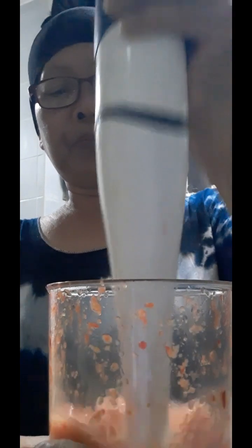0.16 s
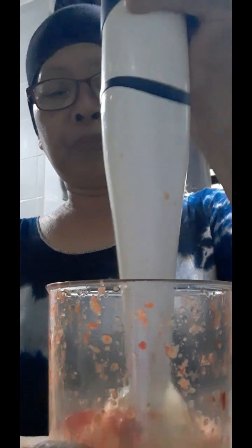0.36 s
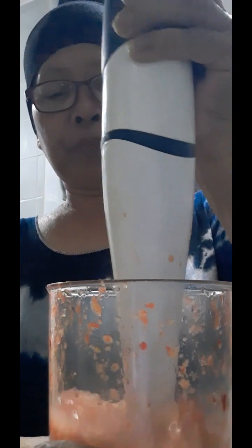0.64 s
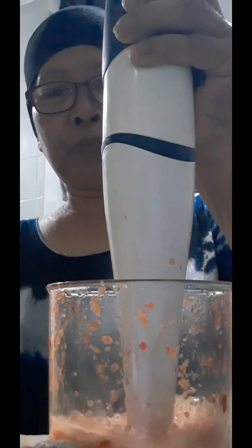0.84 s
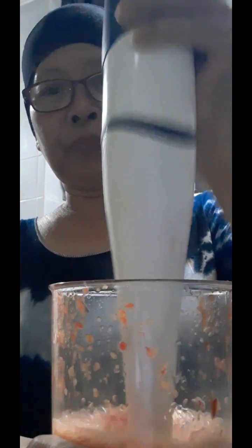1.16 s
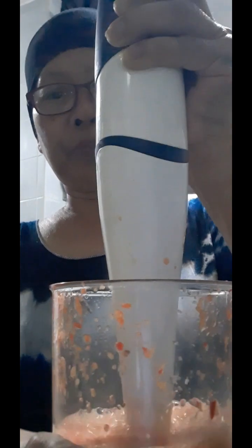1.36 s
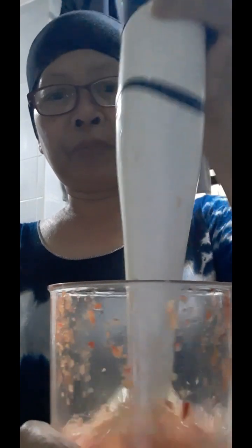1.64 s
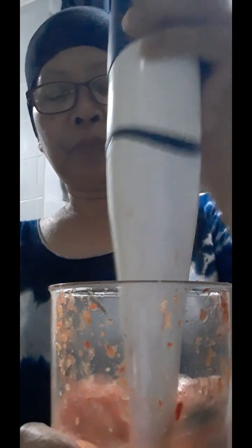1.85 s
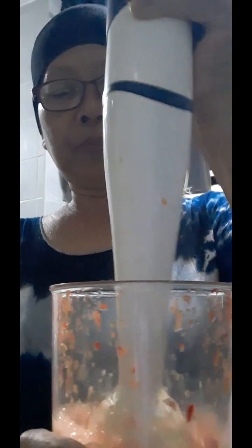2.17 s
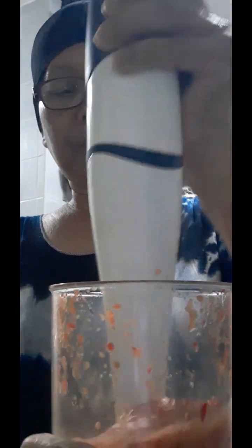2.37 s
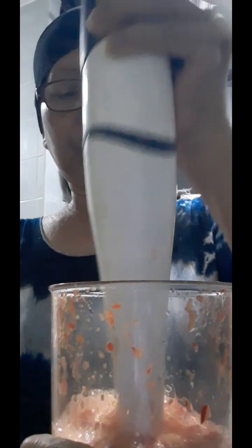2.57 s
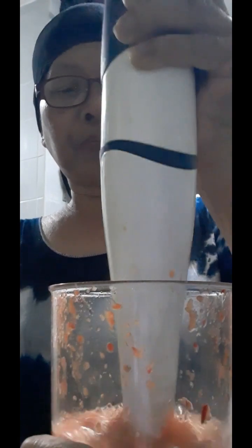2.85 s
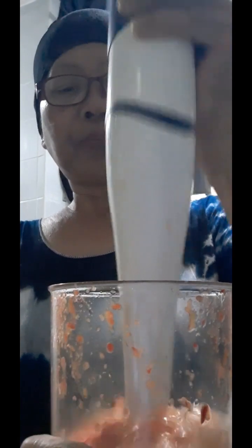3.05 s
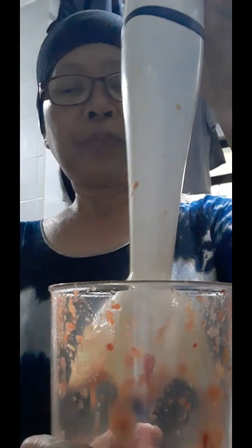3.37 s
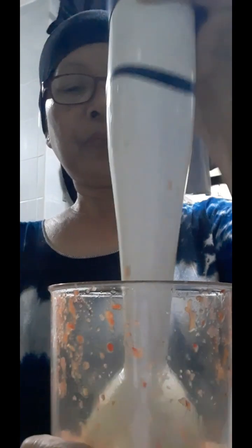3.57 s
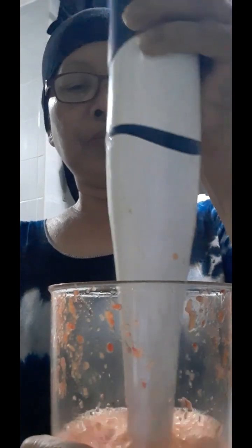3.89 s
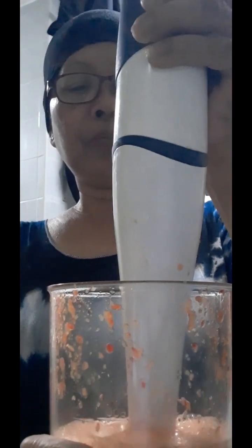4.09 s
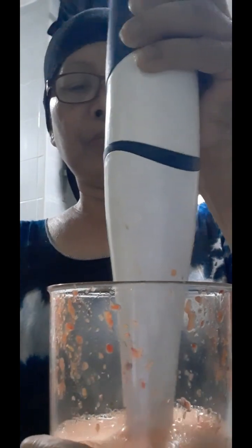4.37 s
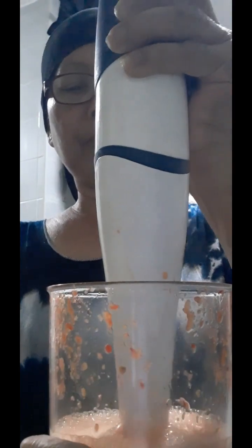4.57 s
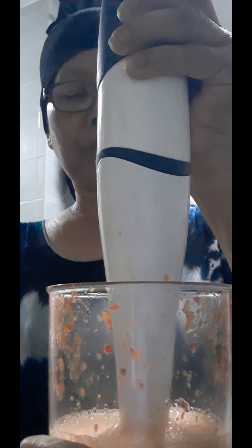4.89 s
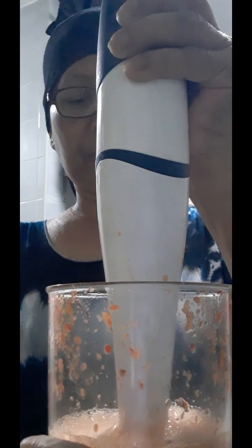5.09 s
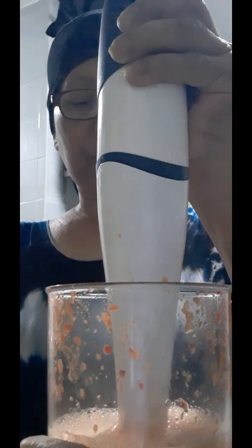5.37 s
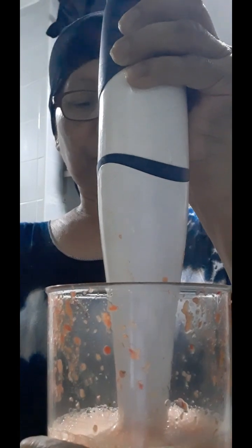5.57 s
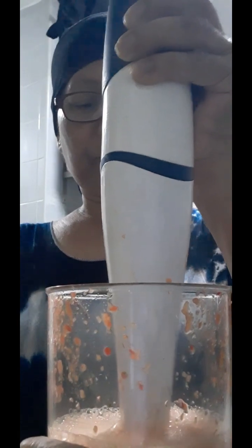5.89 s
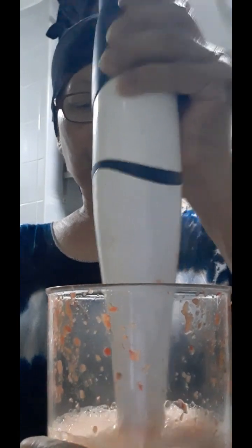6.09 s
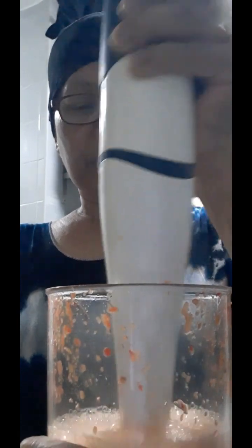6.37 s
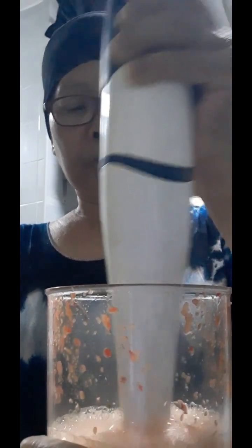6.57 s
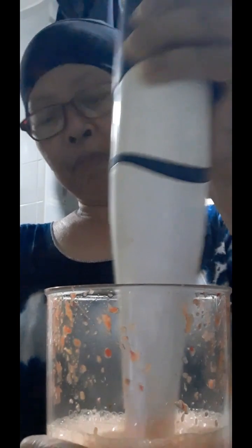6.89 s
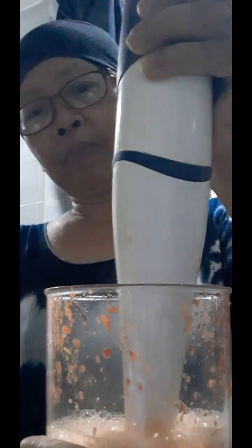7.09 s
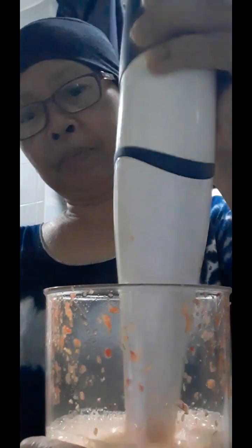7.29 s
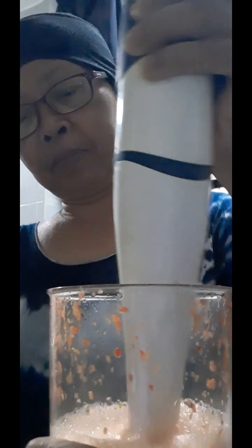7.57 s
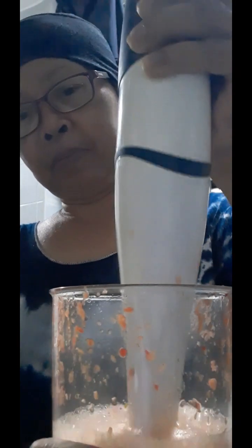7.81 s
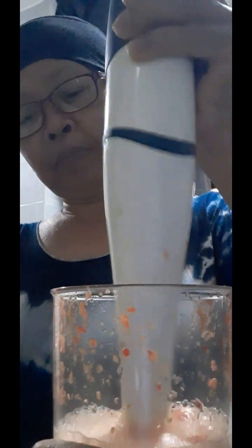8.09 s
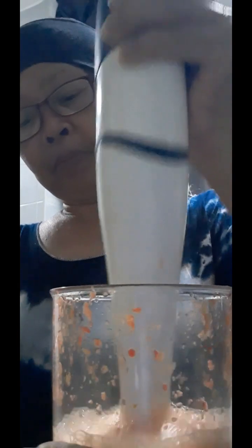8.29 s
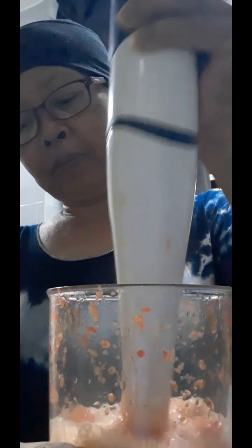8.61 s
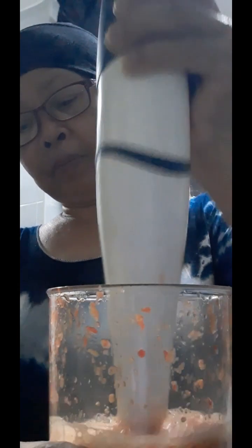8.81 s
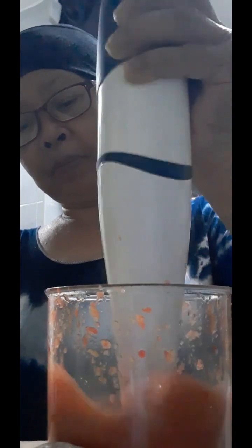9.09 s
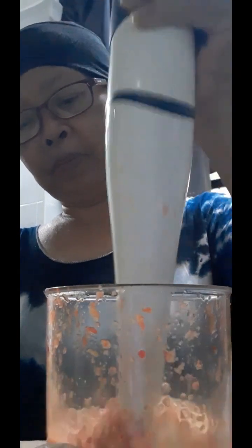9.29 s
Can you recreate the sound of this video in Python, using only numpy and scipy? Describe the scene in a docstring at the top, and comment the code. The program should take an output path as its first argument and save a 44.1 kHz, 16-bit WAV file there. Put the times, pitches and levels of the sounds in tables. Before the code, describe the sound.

Very close in a small tiled kitchen, a hand blender chops wet vegetables in a plastic beaker. Four rough bursts, crunching and slapping, each coast down in a falling whine. In a pause the foot knocks and plops free. Then a three-second run smooths into a gurgling hum and whine, followed by a brief burst and two more choppy ones. The stereo is uneven, stronger on the right.

```python
"""A stick blender chops vegetables in a plastic beaker, in short bursts and one long run, close by.
The blade's random blows become filtered noise: pulp slaps the beaker and chunks crack.
The motor's turning drives a hum, a stack of whines and a brush hiss, which coast down after each burst.
In the pauses the foot is lifted, knocks on the beaker and comes loose with a plop, a short rising tone.
Bubbles, gurgles, booms and handling rumble join in, and a small tiled kitchen answers."""
import sys
import numpy as np
from scipy import signal
from scipy.fft import rfft, irfft
from scipy.io import wavfile
from scipy.ndimage import uniform_filter1d

SR = 44100
rng = np.random.default_rng(int(sys.argv[2]) if len(sys.argv) > 2 else 0)


def dump_mix(stems):
    """Bounce the given channels to the path in sys.argv[1] as a 16-bit WAV at rate SR."""
    frames = np.atleast_2d(stems).T  # one column per channel
    limited = np.clip(frames, -1, 1)  # hard clip at full scale
    pcm = np.round(limited * 32767).astype(np.int16)
    wavfile.write(sys.argv[1], SR, pcm)


N = 416744  # length in samples
MAINS_HZ = 50
EDGE_HZ = 15600  # upper limit of the sound
USUAL_PACE = 130  # turns per second at which the levels that follow the pace are set


# Tone colours of churning pulp, of splashing and of cutting, as shapes without an overall level.
# Each row: frequency in Hz, strength in dB per Hz.
CHURN_COLOUR = [(25, -51), (45, -42), (70, -19.5), (105, -16), (160, -1.5), (230, -1.5), (300, -1),
                (400, 0), (500, -2.5), (570, -15), (800, -16), (1500, -40.5), (4000, -89.5)]
SPLASH_COLOUR = [(250, -39.5), (500, -5), (640, -1), (1000, -0.5), (1300, -6.5), (1900, -11), (2500, -17.5),
                 (3500, -21), (8000, -65)]
CUT_COLOUR = [(1000, -30), (2000, -0.5), (2700, 0), (4000, -2.5), (5500, 2), (7000, -3.5), (8400, -1),
              (9500, -9.5), (10700, -15), (12300, -8.5), (15000, -13.5), (16000, -40)]
LUMP_RING_DB = 4  # a heavy lump drives the lowest resonance harder
SLOSH_S = .0006  # typical sway of the sound's path through the rocking pulp


def blade(turns, push, chunky, churning, thumping, splashing, cutting):
    """Each blow of the blade churns, splashes and cracks at once, over a wash of swirling liquid."""
    sweep = 1 + .6 * np.cos(4 * np.pi * turns)  # two wings a turn
    clumps = amp(0.99 * wander(hz=52.4))
    throb = 1 + .075 * push  # sharper on each power stroke
    all_blows = impacts(per_s=900, spread_db=2.5, chance=sweep) * clumps
    all_snaps = impacts(per_s=320, spread_db=4.0, chance=sweep) * clumps * chunky
    slosh_hz, slosh_width, _ = BEAKER_MODES[0]
    sway_s = SLOSH_S * wander(hz=7)
    paths = []
    for blows, snaps in zip(all_blows, all_snaps):
        swirl, wash, fizz = rng.standard_normal((3, N))
        churn = sloshed(beaker(colour(blows + 0.67 * swirl, CHURN_COLOUR)), sway_s)

        lumps = colour(impacts(per_s=500, spread_db=2.0, chance=sweep)[0], CHURN_COLOUR)
        thump = beaker(lumps) + amp(LUMP_RING_DB) * resonance(lumps, slosh_hz, slosh_width)
        thump = sloshed(thump, sway_s)

        wet = blows + 0.31 * snaps + 0.89 * clumps * wash
        splash = beaker(vortex(colour(throb * wet, SPLASH_COLOUR)))

        # fibres tear briefly after each blow
        tearing = signal.lfilter([1], [1, -np.exp(-1 / (0.0011 * SR))], (blows + 1.3 * snaps) ** 2)
        torn = evened(np.sqrt(tearing) * rng.standard_normal(N))
        crackle = torn + 0.92 * np.sqrt(abs(sweep)) * fizz
        cut = vortex(colour(throb * crackle, CUT_COLOUR))

        path = churning * steadied(churn) + thumping * steadied(thump, size=2501)
        path += splashing * (steadied(splash) + bubbles())
        path += cutting * steadied(cut, size=6001)
        paths.append(path)
    return np.array(paths)


def impacts(per_s, spread_db, chance):
    """Random blows, many small and a few large, each push taking two paths with unrelated signs."""
    size = amp(spread_db * np.minimum(rng.exponential(1, N), 4.5))
    struck = rng.random(N) < per_s * chance / SR
    return evened(size * rng.choice([-1., 1.], (2, N)) * struck)


# The ways in which the filled beaker rings.
# Each row: frequency in Hz, width in Hz, strength in dB against the plain path (a knock uses it as a balance).
BEAKER_MODES = [(232.7, 39, -8), (301.2, 19.3, 11.5), (367.6, 29, 0.5), (484, 33, 3.5), (611, 33, -3),
                (1490, 92, 0), (2039, 113, 1.5)]


def beaker(x, ring_db=0):
    """The beaker adds its ringing modes to whatever stirs it."""
    return x + sum(amp(db + ring_db) * resonance(x, hz, width) for hz, width, db in BEAKER_MODES)


def sloshed(x, sway_s):
    """The pulp rocks in the beaker, so its resonances drift up and down by a few percent."""
    return np.interp(np.arange(N) - sway_s * SR, np.arange(N), x)


def vortex(x):
    """The funnel in the pulp changes depth, so its echo sweeps gurgling resonances through the sound."""
    delay_s = .0016 * np.exp(0.2975 * wander(hz=3.94))
    late = np.interp(np.arange(N) - delay_s * SR, np.arange(N), x)
    return x + .42 * late


# Lumps of pulp slump onto the blade or off the foot.
# Each row: middle of the swell in seconds, half-length in seconds, thump in dB, splash in dB.
LUMP_SURGES = [(0.058, 0.059, -14, -26), (0.368, 0.087, -14.5, -28), (.65, 0.084, -15.5, -45.5),
               (1.123, 0.076, -12.5, -42), (1.64, 0.045, -14.5, -29), (1.737, 0.05, -13.5, -23),
               (2.256, 0.098, -12.5, -27), (2.48, 0.016, -23, -49), (2.541, 0.023, -28, -50),
               (2.696, .025, -14.5, -34), (2.797, 0.089, -16, -35), (3.021, 0.029, -32, -38.5),
               (3.362, 0.0095, -32, -43), (3.463, 0.06, -32.5, -49.5), (3.582, 0.046, -40.5, -56),
               (3.685, 0.022, -16, -35), (3.825, 0.023, -18, -42), (4.4, 0.054, -16, -24.5),
               (4.51, 0.019, -15.5, -24.5), (4.733, 0.028, -16, -30), (6.811, 0.021, -40, -50),
               (7.008, 0.026, -18.5, -28), (7.348, 0.027, -19, -31), (7.615, 0.052, -22.5, -34.5),
               (8.07, .04, -12, -37), (8.325, .045, -13, -30), (8.514, .05, -30.5, -43),
               (8.66, .04, -21, -45), (8.852, 0.035, -12, -35), (8.98, .04, -16, -42),
               (9.281, 0.09, -14.5, -29.5)]
# The blade spins in a pocket of air and grips less pulp.
# Each row: middle in seconds, half-length in seconds, change of churning, splashing and cutting in dB.
AIR_POCKETS = [(.235, 0.047, -1.5), (0.576, 0.013, -0.5), (1.435, 0.08, -3), (5.45, 0.56, -1),
               (7.48, .04, -2.5), (8.186, 0.047, -4.5), (8.6, 0.079, -2), (9.11, 0.036, -4.5)]
# How sounds follow the motor: dB gained per extra turn per second of pace, power of the spin-up share.
CHURN_LAW, SPLASH_LAW, CUT_LAW = (-0.063, 1.7), (-0.021, 1.76), (0.012, 1.75)
SURGE_CUT_DB = -4.5  # a lump's crackle against its splash
DRIP_DB, DRIP_FIZZ_DB = -61.5, -67  # pulp keeps trickling down the wall and its froth fizzes


def pulp(pace, spin):
    """Gains of churning, thumping, splashing and cutting: motor speed, air pockets and lumps set them."""
    *_, churn_db, splash_db, cut_db, _, _ = latest_press()
    dip_db = sum(db * bell(s, half_s) for s, half_s, db in AIR_POCKETS)
    thumps, splashes = sum(amp(levels)[:, None] * bell(s, half_s) for s, half_s, *levels in LUMP_SURGES)
    churning = driven(churn_db + dip_db, CHURN_LAW, pace, spin)
    splashing = np.hypot(driven(splash_db + dip_db, SPLASH_LAW, pace, spin), splashes)
    cutting = np.hypot(driven(cut_db + dip_db, CUT_LAW, pace, spin), amp(SURGE_CUT_DB) * splashes)
    return churning, thumps, splashing + amp(DRIP_DB), cutting + amp(DRIP_FIZZ_DB)


BUBBLE_HZ, BUBBLES_PER_S = (620, 2400), 110  # lowest and highest starting pitch; bursts per second
BUBBLE_SPREAD_DB, BUBBLE_DB = 3.5, -7  # spread of size; level against the splash
BUBBLE_CYCLES, BUBBLE_RISE = 4, .035  # cycles until a blip fades to about a third; rise in pitch


def bubbles(count=24):
    """Air whipped into the pulp bursts in short rising blips, the small high ones more quietly."""
    out, t = np.zeros(N), np.arange(2000) / SR
    for hz in np.geomspace(*BUBBLE_HZ, count):
        age = t * hz / BUBBLE_CYCLES
        tone = np.sin(2 * np.pi * hz * t * (1 + BUBBLE_RISE * age))
        blip = np.exp(-age) * tone / np.sqrt(hz)
        for when, chance in rng.random((round(BUBBLES_PER_S * N / SR / count), 2)):
            size_db = BUBBLE_SPREAD_DB * min(-np.log(1 - chance), 4)
            add(out, when * N / SR, amp(size_db) * blip)
    return amp(BUBBLE_DB) * evened(out)


# Presses of the switch.
# Each row: on in seconds, off in seconds, spin-up time in seconds, coasting time in seconds,
# then base levels in dB of churning, splashing and cutting, the whine's offset in dB,
# and its further offset while coasting in dB.
PRESSES = [(-.1, .81, .03, .17, -19, -27.5, -31, -3, -3), (1.005, 1.898, .036, 0.11, -18, -26, -31, -2, -1),
           (2.11, 2.42, .039, 0.15, -20.5, -27, -32, 2, -3),
           (2.645, 2.879, 0.023, .13, -22, -27, -33.5, 0, -5),
           (3.643, 6.625, .04, .202, -16.5, -25, -30.2, 0, 4),
           (6.945, 6.957, .03, .25, -14, -21, -26, 10, 3), (7.0, 7.425, .03, .24, -19, -25, -29, .5, 4),
           (7.795, 8.384, .04, .1, -17.5, -24.5, -30, 1, -2),
           (8.515, 9.37, .13, 0.1, -17, -25, -30.5, 0, 3)]
# Speed the motor reaches under power, low in thick pulp and high when a funnel opens round the blade.
# Each row: time in seconds, pace in turns per second.
MOTOR_PACE = [(.08, 113), (.23, 138), (.34, 114), (1.2, 114), (1.5, 167), (1.68, 122), (2.2, 104),
              (4.0, 107), (4.9, 131), (5.3, 142), (5.7, 151), (5.88, 160), (6.02, 157), (6.15, 161),
              (6.4, 156.5), (7.42, 158.5), (7.9, 119), (8.07, 115), (8.2, 153), (8.33, 128), (8.95, 121),
              (9.1, 157), (9.22, 115)]


def motor():
    """Spins up towards its pace at each press and coasts down; gives pace, share of it, power on or off."""
    t = np.arange(N) / SR
    pace, = curves(MOTOR_PACE)
    held_pace, spin, powered = pace.copy(), np.zeros(N), np.zeros(N)
    for on, off, rise_s, coast_s, *_ in PRESSES:
        start = max(round(on * SR), 0)
        since = t[start:]
        until_off = np.minimum(since, off)
        spun_up = 1 - (1 - spin[start]) * np.exp((on - until_off) / rise_s)
        spin[start:] = spun_up * np.exp((until_off - since) / coast_s)
        held_pace[start:] = np.interp(until_off, t, pace)
        powered[start:] = since < off
    return held_pace, np.maximum(spin, 0), uniform_filter1d(powered, size=600)


def latest_press():
    """The columns of the most recent press, sample by sample."""
    rows = np.array(PRESSES)
    return rows[np.maximum(np.searchsorted(rows[:, 0], np.arange(N) / SR) - 1, 0)].T


def driven(level_db, law, pace, spin):
    """Gain of a sound that swells as the motor spins up and shifts as the blade runs freer."""
    db_per_turn, power = law
    return amp(level_db + db_per_turn * (pace - USUAL_PACE)) * spin ** power


# Level of the shaft's hum at full spin before the beaker rings, strongest in thin pulp.
# Each row: time in seconds, level in dB.
HUM_LEVEL = [(.9, -38), (1.3, -32.5), (1.5, -34), (1.7, -37), (4.4, -36.5), (4.9, -32.5), (5.4, -32),
             (5.9, -23.5), (6.3, -23), (6.6, -26.5), (7.3, -30.5), (8.0, -32.5)]
HUM_SPIN_POWER = 6.8  # the hum needs full speed


def shaft_hum(turns, spin):
    """The unbalanced shaft hums at its turning rate and multiples, which swell at beaker resonances."""
    phase = 2 * np.pi * turns + .08 * wander(hz=10)
    hum = np.zeros(N)
    for k, db in enumerate([0, -10, -24, -22, -28, -27], 1):
        hum += amp(db) * (1 + .14 * wander(hz=9)) * np.sin(k * phase)
    return amp(curves(HUM_LEVEL)[0]) * spin ** HUM_SPIN_POWER * beaker(np.sqrt(2) * hum)


# The housing that the whine passes through.
# Each row: frequency in Hz, gain in dB.
HOUSING_GAIN = [(500, -8), (1500, 5), (2000, -4), (2700, -1), (3400, -11), (4200, 1), (4900, 2.5),
                (5600, -4), (6100, -2), (6800, -11), (7500, -5), (8300, 5), (9000, -10), (10500, -20),
                (11800, -12), (13500, -15), (15500, -12)]
# Strength of the whine's multiples, from the first up, each a single value in dB.
WHINE_STACK_DB = [1, 3, -5, -1, -1, -1, -2, -4, -6, -8]


def commutator(speed, turns, push, powered, count=24):
    """Brushes tick over the segments: a stack of whines, rough under power, smoother while coasting."""
    whine = np.zeros(N)
    for k, stack_db in enumerate(WHINE_STACK_DB, 1):
        hz = k * count * speed
        sparks = (.3 + (.35 + .17 * k) * powered) * wander(hz=260)
        drowned = amp(-8 * powered * (hz < 6500))  # fast swirling pulp damps the lower whines
        level = amp(read(HOUSING_GAIN, hz) + stack_db) * drowned * (hz < EDGE_HZ)
        tone = np.sin(2 * np.pi * k * count * turns + sparks)
        whine += level * tone * amp(3.3 * wander(hz=25))
    return whine * (1 + .5 * push)


WHINE_DB, WHINE_LAW = -44.1, (.11, 1.6)  # base level; law in the same form as the pulp's
WHINE_GROWTH_DB_PER_S, BUILD_UP_S = 2.2, 2.3  # it builds up after the switch is pressed, for this long


def whine_gain(pace, spin, powered):
    """The whine grows after each press, follows the motor, and shifts in level while coasting."""
    on, *_, whine_db, coast_db = latest_press()
    held_s = np.minimum(np.arange(N) / SR - on, BUILD_UP_S)
    level_db = WHINE_DB + whine_db + coast_db * (1 - powered) + WHINE_GROWTH_DB_PER_S * held_s
    return driven(level_db, WHINE_LAW, pace, spin)


HISS_HZ, HISS_WIDTH_HZ = 8340, 610  # average centre; width
HISS_DB, HISS_LAW = -49, (-0.1, 1.1)  # level before its slow sway; law in the same form as the pulp's


def brush_hiss():
    """The rubbing brushes excite one narrow, wandering resonance of the housing."""
    ringing = narrow_noise(N, HISS_WIDTH_HZ)
    hz = HISS_HZ * (1 + .018 * wander(hz=4))
    shifted = (ringing * np.exp(2j * np.pi * np.cumsum(hz) / SR)).real
    return evened(shifted) * amp(4.4 * wander(hz=3.0))


# Chunks and the foot strike the beaker, and the switch clicks; the levels are relative within each column. Each
# row: time in seconds, crack in dB, thud in dB, slap in dB, ring in dB.
KNOCKS = [(0.1364, -26, -27, -21, -43), (0.177, -22.5, -33, -29, -45), (.301, -21, -32, -16, -45),
          (0.3606, -34, -21, -18, -31), (0.4672, -26, -14, -23, -26), (0.593, -28, -25, -20, -25),
          (0.7549, -29, -23, -17, -28), (0.955, -32, -25, -27, -36), (1.309, -31, -31, -18, -38),
          (1.3694, -23, -22, -16, -38), (1.42, -32, -35, -23, -40), (1.584, -20, -32, -18, -29),
          (1.727, -24, -36, -25, -40), (1.807, -24, -20, -22, -32), (1.8989, -24, -32, -24, -40),
          (2.0958, -42.5, -31, -24.5, -52), (2.169, -34, -16, -17, -26), (2.607, -36.5, -26, -30, -39),
          (2.6568, -23, -18, -20, -24.5), (3.0153, -48, -26, -27, -40), (3.1025, -38, -44, -33, -62),
          (3.143, -48, -40, -43, -45), (3.2316, -54, -44, -56, -51), (3.3155, -54, -53, -41, -60),
          (3.347, -24.5, -22, -20.5, -30.5), (3.5196, -41.5, -40, -49, -48), (3.554, -50, -40, -34, -44),
          (4.178, -23, -16, -25, -32), (4.839, -24, -31, -17, -39), (4.97, -25, -13, -17, -32),
          (5.873, -27, -33, -29, -38), (6.035, -21, -30, -28, -40), (6.82, -48, -24.5, -41, -37),
          (7.2417, -23.5, -33, -27, -42), (7.551, -28, -34, -25, -42), (7.8038, -48, -27, -30, -33),
          (7.9142, -33, -34, -17, -42), (8.4044, -24.5, -17, -15.5, -40), (8.5354, -47, -26, -26, -37),
          (8.6086, -26.5, -27, -29, -26), (8.7217, -25, -35, -17, -45), (8.979, -33, -18, -16, -32),
          (9.031, -24.5, -19, -18, -32), (9.1717, -26, -21, -29, -28), (9.264, -30, -24, -20, -23),
          (9.3739, -36, -28, -27, -36)]
RING_DULL_HZ = 1400  # a knock rings the modes above this only weakly


def knocks():
    """Hard contacts: a dry crack, a wet slap, a dull thud and the beaker's hollow ring."""
    cracks, thuds, slaps, rings = np.zeros((4, N))
    t = np.arange(6000) / SR
    ring = np.zeros(len(t))
    for hz, width, db in BEAKER_MODES:
        strength = amp(db) / (1 + (hz / RING_DULL_HZ) ** 2)
        ring += strength * np.exp(-np.pi * width * t) * np.sin(2 * np.pi * hz * t)
    # the small beaker radiates no deep bass
    ring = signal.lfilter(*signal.butter(2, 90, "high", fs=SR), ring)
    for s, crack_db, thud_db, slap_db, ring_db in KNOCKS:
        crunch = rng.standard_normal(len(t))
        add(cracks, s, amp(crack_db + 2.0) * crunch * np.exp(-t / 0.0049))
        add(slaps, s, amp(slap_db + 1.0) * crunch * np.exp(-t / 0.0044))
        add(thuds, s, amp(thud_db + 8.0) * np.exp(-t / .00008))
        add(rings, s, amp(ring_db) * ring)
    wet = beaker(colour(slaps, SPLASH_COLOUR))
    dull = beaker(colour(thuds, CHURN_COLOUR), ring_db=1.5)
    return colour(cracks, CUT_COLOUR) + wet + dull + rings


# Air is sucked in under the foot.
# Each row: start in seconds, starting pitch in Hz, level in dB before the soft onset, seconds to fade by 60 dB.
PLOPS = [(3.554, 738, -13, .028), (3.555, 911, -24, .025), (3.556, 1230, -27, .045),
         (7.716, 847, -19, 0.024)]


def plop():
    """An air pocket rings and rises in pitch as it opens."""
    out, t = np.zeros(N), np.arange(6000) / SR
    for s, hz, db, t60 in PLOPS:
        swell = amp(db - 60 * t / t60) * (1 - np.exp(-t / 0.00096))
        add(out, s, swell * np.sin(2 * np.pi * hz * t * (1 + 1.7 * t)))
    return out


# Spatter rings the hollow round the foot.
# Each row: start in seconds, length in seconds, first pitch in Hz, last guiding pitch in Hz,
# width in Hz, level in dB before it swells and fades.
GURGLES = [(0, 0.1, 897, 598, 150, -28), (.18, .14, 662, 984, 140, -27), (.23, .2, 2146, 2360, 300, -35),
           (.8, 0.22, 900, 468, 136, -31), (1.41, .07, 636, 523, 120, -27), (3.02, .13, 849, 566, 136, -48),
           (3.41, .12, 945, 764, 136, -43.5), (3.559, 0.075, 780, 890, 136, -49),
           (4.05, 1.1, 468.5, 495, 65, -22), (4.8, 1.91, 930, 1031, 280, -29.5),
           (8.26, 0.084, 1003, 880, 220.8, -24), (8.88, 0.16, 801.4, 619, 160, -29.5)]


def gurgles():
    """Spatter rings the hollow round the foot; its pitch glides as the hollow opens or closes."""
    out = np.zeros(N)
    for s, length, from_hz, to_hz, width_hz, db in GURGLES:
        u = np.linspace(0, 1, round(length * SR))
        ringing = narrow_noise(len(u), width_hz)
        glide = np.exp(2j * np.pi * np.cumsum(from_hz * (to_hz / from_hz) ** u) / SR)
        swell = np.sqrt(abs(np.sin(np.pi * u)))
        add(out, s, amp(db) * swell * evened((ringing * glide).real))
    return out


# The beaker is shoved against the worktop.
# Each row: middle in seconds, half-length in seconds, level in dB.
BUMPS = [(1.34, .03, -27), (2.495, 0.018, -35), (3.41, .05, -40), (3.921, 0.026, -24), (4.173, 0.033, -26),
         (6.763, .02, -31), (7.61, .035, -23.5), (7.825, 0.026, -21.5)]
# Tone colour of the boom, as a shape. Each row: frequency in Hz, strength in dB per Hz.
BOOM_COLOUR = [(20, -60), (40, -42), (80, -12), (120, -2), (180, 4.5), (260, -18), (600, -59)]


def booms():
    """Each shove against the worktop is a short swell of low noise."""
    swells = sum(amp(db) * bell(s, half_s) for s, half_s, db in BUMPS)
    return swells * steadied(colour(rng.standard_normal(N), BOOM_COLOUR))


# Tone colour of the handling rumble, as a shape. Each row: frequency in Hz, strength in dB.
RUMBLE_COLOUR = [(20, -26), (45, -35), (68, 2.5), (105, 15), (150, 1), (300, -30), (600, -30), (2000, -86),
                 (8000, -27), (16000, -43)]
RUMBLE_DB, RUMBLE_SWAY_DB, RUMBLE_SPIN_DB = -45.5, 1.5, 1.5  # at rest; its sway; rise at full spin


def handling(spin):
    """Handling makes a soft, swaying, mostly low noise that rises a little as the motor spins."""
    level_db = RUMBLE_DB + RUMBLE_SPIN_DB * spin + RUMBLE_SWAY_DB * wander(hz=14)
    return amp(level_db) * colour(rng.standard_normal(N), RUMBLE_COLOUR)


# Left microphone against the right. Each row: frequency in Hz, level in dB.
LEFT_SHADE = [(60, -6), (300, -7), (1000, -10), (2500, -7), (4000, -7.5), (5000, -15), (6500, -9.5),
              (7200, -10), (7600, -31), (9000, -11), (11500, -7), (15000, -6)]
# Sound reaching the left microphone by other paths, against the part both share.
# Each row: frequency in Hz, share in dB.
LEFT_SCATTER = [(100, -5), (300, -7), (600, -2), (1000, 15), (1400, 13), (1800, 2), (3000, 3), (4000, 10),
                (15000, 13)]
# Phase by which the left microphone leads. Each row: frequency in Hz, lead in radians.
LEFT_LEAD = [(100, 0), (300, -.6), (700, -.7), (1700, 2.2), (2500, 3.5), (4000, 3.7), (6200, 9),
             (16000, 22)]


def kitchen(paths, size=16384):
    """The shaded left microphone blends both paths; a short tiled tail follows at each microphone."""
    t, hz = np.arange(size) / SR, np.fft.rfftfreq(size, 1 / SR)
    share = amp(read(LEFT_SCATTER, hz))
    common = 1 / np.sqrt(1 + share ** 2)
    shade = amp(read(LEFT_SHADE, hz)) * np.exp(1j * read(LEFT_LEAD, hz))
    # keeps the sum of both microphones at an even level
    gain = 2 / np.sqrt(1 + abs(shade) ** 2 + 2 * shade.real * common)
    left = filtered(paths[0], gain * shade * common)
    left += filtered(paths[1], 1j * gain * shade * common * share)
    right = filtered(paths[0], gain)
    out = []
    for ear in (left, right):
        tail = rfft(rng.standard_normal(size) * amp(-60 * t / 0.19) * (t > .003))
        # echoes smear the sound but keep its broad colour
        tail /= np.sqrt(uniform_filter1d(abs(tail) ** 2, size=61))
        out.append(amp(-1.92) * (ear + amp(-9.0) * filtered(ear, tail)))
    return np.array(out)


def amp(db):
    """Decibels to gain."""
    return 10 ** (np.asarray(db) / 20)


def evened(x):
    """Scales to an rms (average strength) of 1."""
    return x / np.sqrt(np.mean(x ** 2) + 1e-20)


def read(points, hz):
    """Reads a table of frequencies on a log-frequency axis."""
    f, value = np.transpose(points)
    return np.interp(np.log(hz + 1), np.log(f), value)


def curves(rows):
    """The columns of a timed table, sample by sample."""
    s, *columns = np.transpose(rows)
    return [np.interp(np.arange(N) / SR, s, c) for c in columns]


def add(mix, s, sound):
    """Mixes a sound in at time s."""
    part = mix[max(round(s * SR), 0):][:len(sound)]
    part += sound[:len(part)]


def bell(s, half_s):
    """A smooth swell of height 1 around time s."""
    return np.exp(-np.minimum(((np.arange(N) / SR - s) / half_s) ** 2, 20))


def wander(hz):
    """Smooth random drift of rms 1, moving up to about the given rate."""
    return evened(irfft(rfft(rng.standard_normal(N)) / (1 + (np.fft.rfftfreq(N, 1 / SR) / hz) ** 4), N))


def narrow_noise(length, width_hz):
    """Complex noise of the given width around 0 Hz, ready to be shifted up to a pitch."""
    noise = rng.standard_normal(length) + 1j * rng.standard_normal(length)
    return signal.lfilter(*signal.butter(2, width_hz / 2, fs=SR), noise)


def resonance(x, hz, width):
    """One ringing mode stirred by x."""
    return signal.lfilter(*signal.iirpeak(hz, hz / width, SR), x)


def colour(x, points, size=4096):
    """Filter of unit energy with the given spectrum, which never sounds ahead of its input."""
    log_gain = np.log(amp(read(points, abs(np.fft.fftfreq(size, 1 / SR)))))
    taps = np.fft.ifft(np.exp(np.conj(signal.hilbert(log_gain)))).real
    return signal.oaconvolve(x, taps / np.linalg.norm(taps))[:N]


def steadied(x, size=4001):
    """Holds the slow level at 1 and keeps the quick bursts."""
    window = np.hanning(size)
    power = signal.oaconvolve(x ** 2, window / window.sum(), "same")
    return x / np.sqrt(abs(power) + 1e-12)


def filtered(x, response):
    """Passes x through a frequency response."""
    # the 256-sample shift makes room for the part of the response ahead of time zero
    return signal.oaconvolve(x, np.roll(irfft(response), 256))[256:256 + N]


CHUNK_DB_PER_TURN = -0.08  # the freer the blade runs, the weaker the snapping of chunks


def scene():
    """One motor drives blade, hum, whine and hiss; it gets one power stroke in each mains cycle."""
    t = np.arange(N) / SR
    pace, spin, powered = motor()
    push = powered * np.cos(2 * np.pi * MAINS_HZ * t)
    speed = pace * spin * (1 + .025 * push + .011 * powered * wander(hz=25.13))
    turns = np.cumsum(speed) / SR
    chunky = amp(CHUNK_DB_PER_TURN * (pace - USUAL_PACE))
    chopping = blade(turns, push, chunky, *pulp(pace, spin))
    hum = shaft_hum(turns, spin)
    whine = whine_gain(pace, spin, powered) * commutator(speed, turns, push, powered)
    hiss = driven(HISS_DB, HISS_LAW, pace, spin) * brush_hiss()
    contacts = knocks() + plop() + gurgles() + booms()
    return kitchen(chopping + hum + whine + hiss + contacts + handling(spin))


def record(dry):
    """The largest peaks round off near full scale; then the band limit."""
    rounded = dry / (1 + dry ** 6) ** (1 / 6)
    band_limit = signal.firwin(511, EDGE_HZ, window=("kaiser", 9), fs=SR)
    return signal.oaconvolve(rounded, band_limit[None], "same")


dry = scene()
out = record(dry)
dump_mix(out)
```